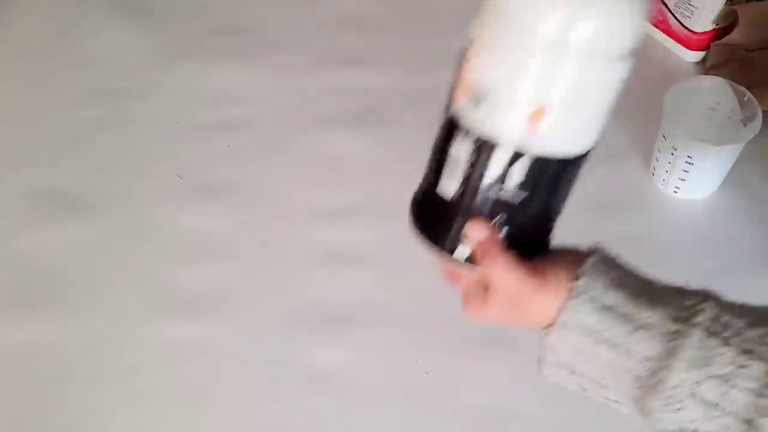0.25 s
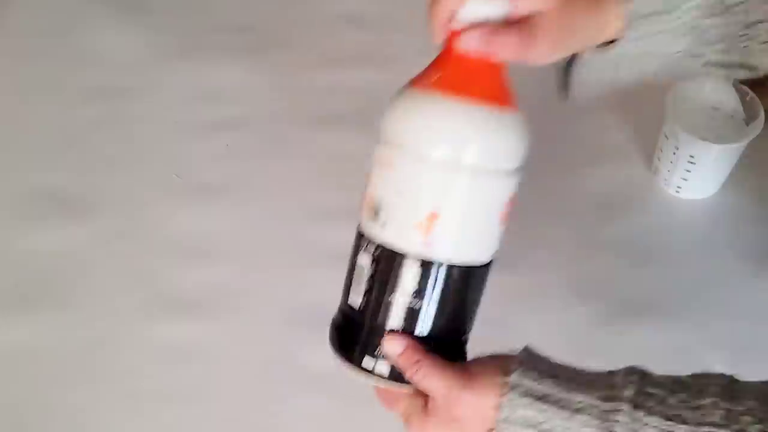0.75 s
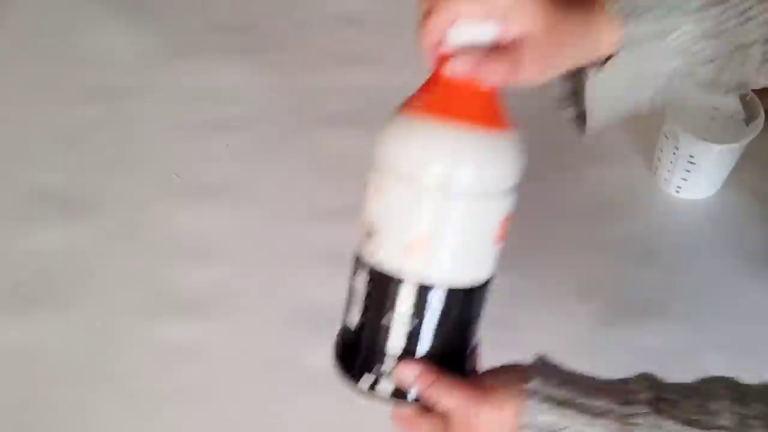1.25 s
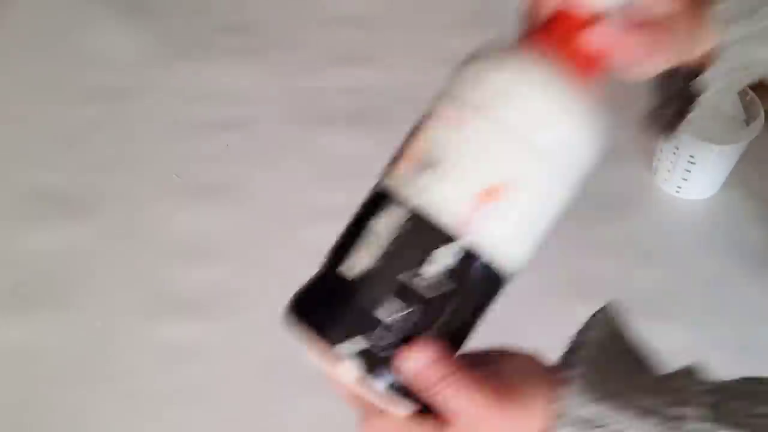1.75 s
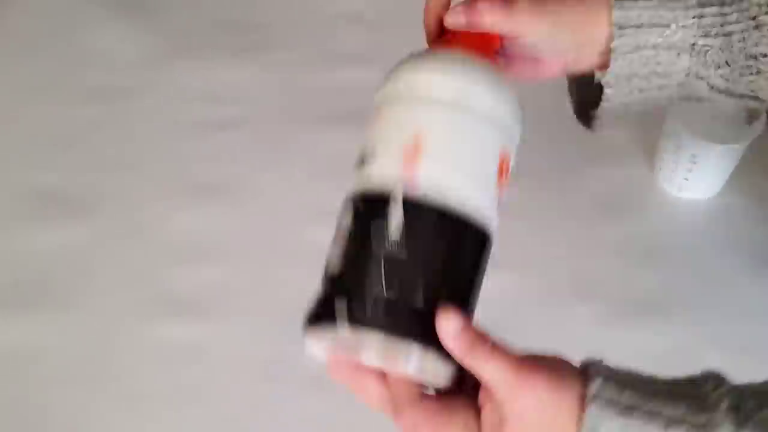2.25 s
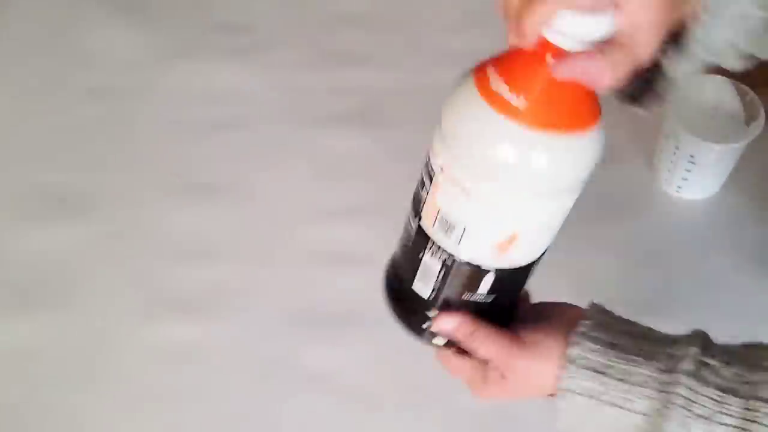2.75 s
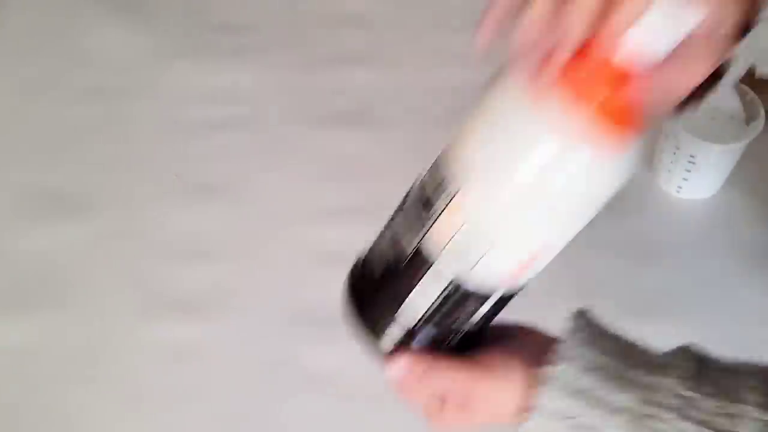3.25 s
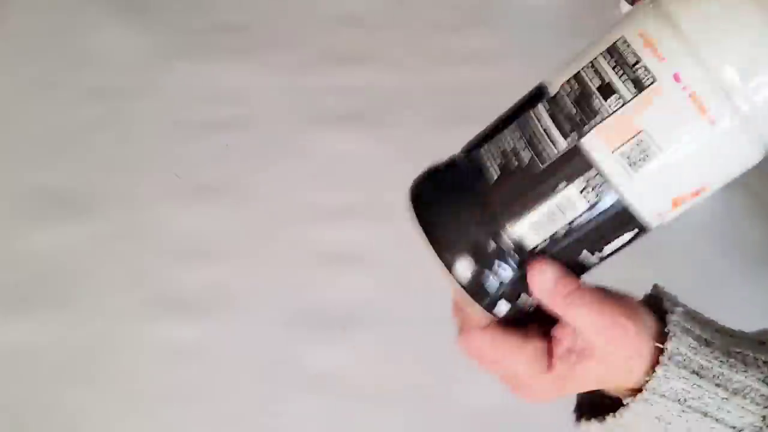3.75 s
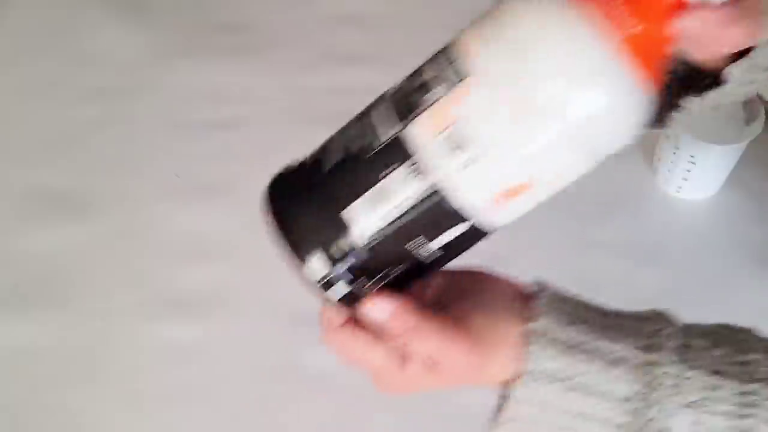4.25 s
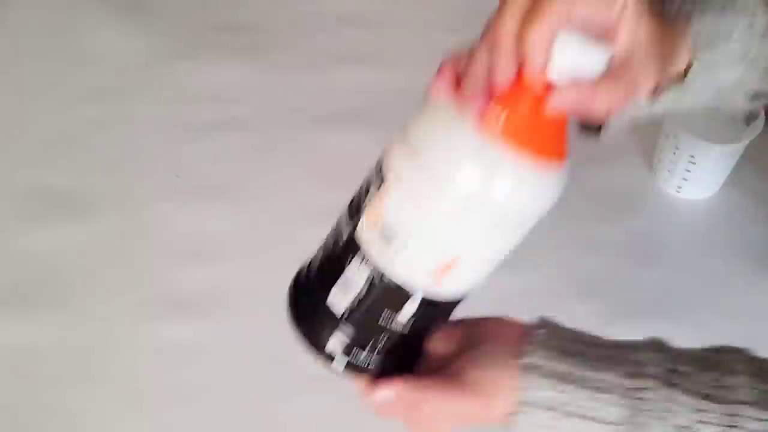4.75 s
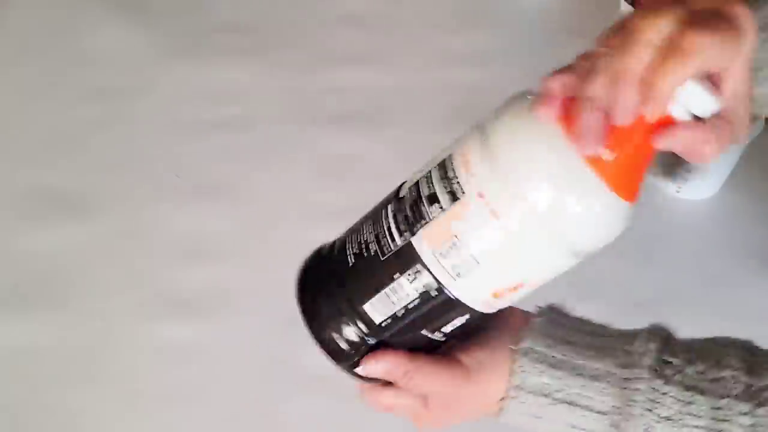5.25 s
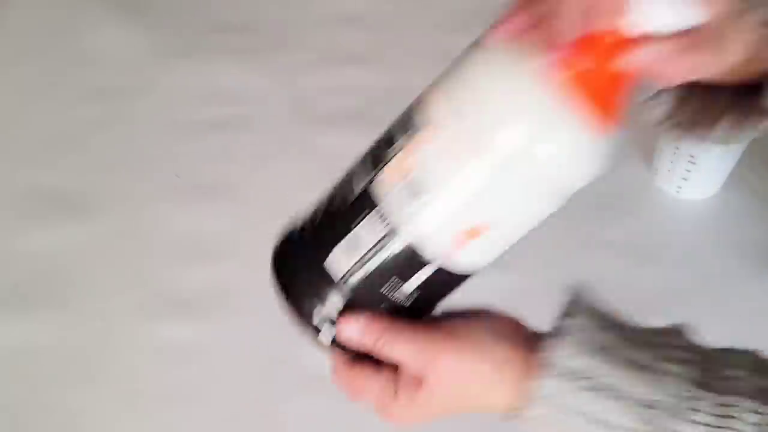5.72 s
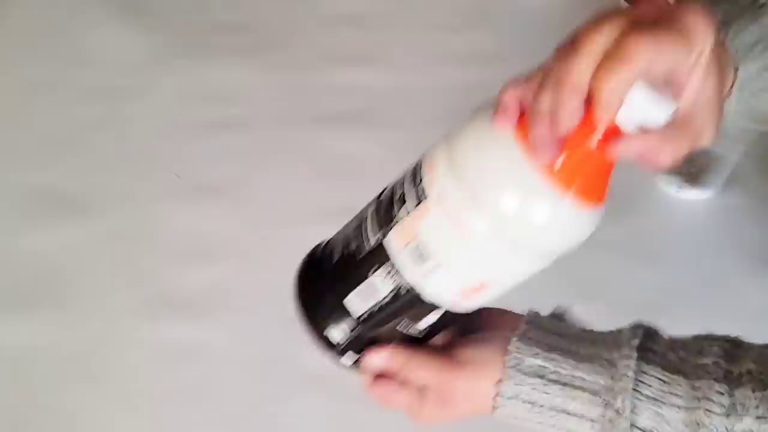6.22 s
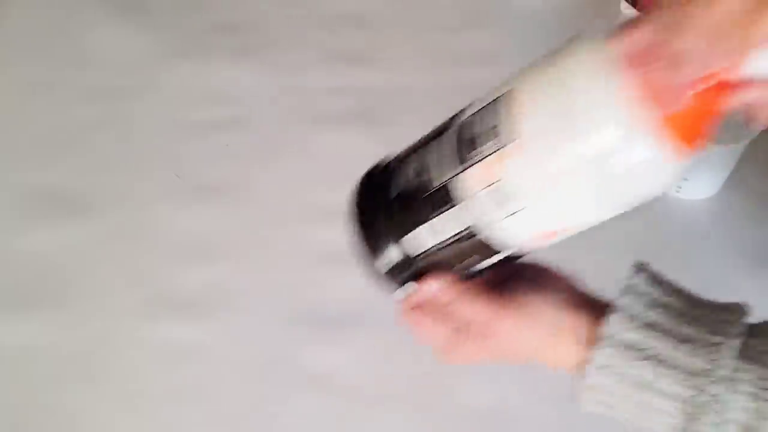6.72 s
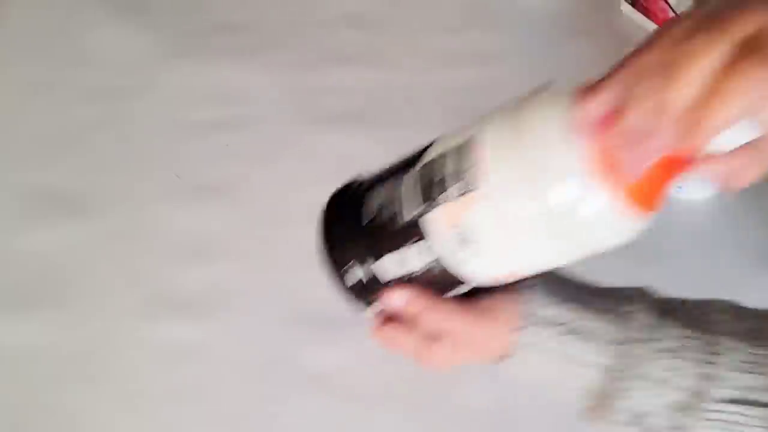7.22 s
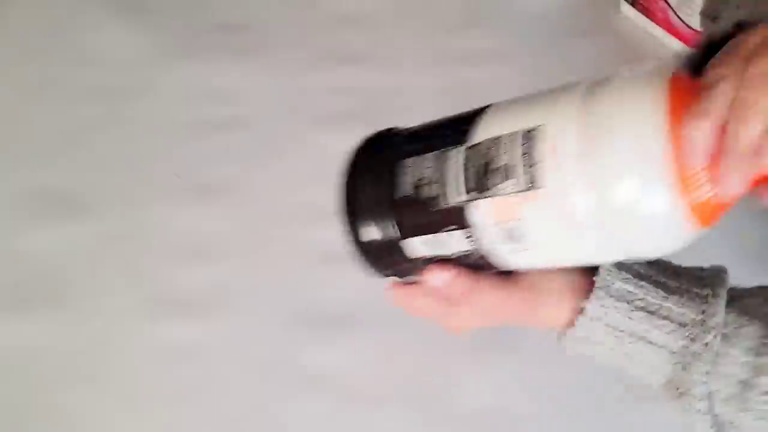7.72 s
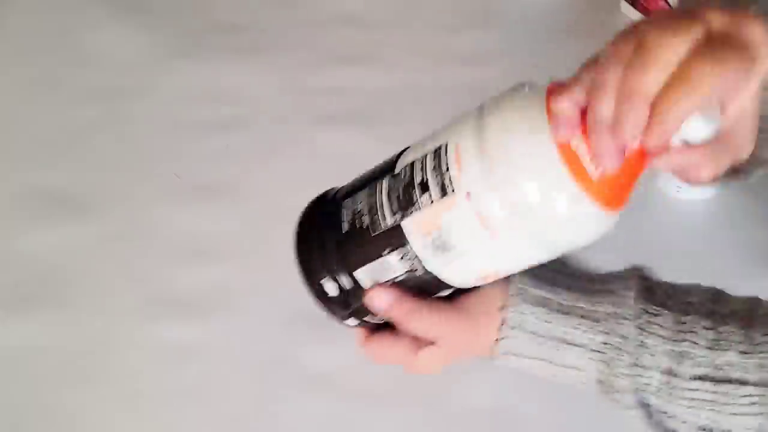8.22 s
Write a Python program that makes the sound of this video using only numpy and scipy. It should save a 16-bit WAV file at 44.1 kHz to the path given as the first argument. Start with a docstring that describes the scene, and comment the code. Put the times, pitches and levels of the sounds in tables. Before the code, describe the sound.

A half-full plastic bottle of thick liquid is shaken hard by hand, sloshing, slapping and popping wetly, with one short lull, in a small room.

```python
"""A plastic bottle, part full of thick liquid, is shaken by hand in a small room over a faint appliance hum.
0-2 s: strokes slap, run along the wall and break into draining froth (noise and short rings under envelopes).
Hands and sleeves rub (stick-slip noise); the wall thumps, pops ring, films smack (damped sines); the shell snaps.
From 0.8 s a few squeezed air pockets gurgle (gliding sines). 2-2.8 s: a lull with faint lumps and pops.
2.8-8.5 s: shaking resumes to the end, with a fizz that has grown slowly since the start."""
import sys
import numpy as np
from scipy import signal
from scipy.fft import rfft, irfft, next_fast_len
from scipy.io import wavfile
from scipy.ndimage import uniform_filter1d

SR = 44100
rng = np.random.default_rng(int(sys.argv[2]) if len(sys.argv) > 2 else 0)


def master(y):
    """Save y as 16-bit WAV."""
    cut = np.clip(np.atleast_2d(y).T, -1, 1)
    pcm = np.round(cut * 32767)  # scale
    wavfile.write(sys.argv[1], SR, pcm.astype(np.int16))


N = 373968

# Levels in the event tables are relative: the gains set in scene() come on top.
# appliance hum partials: (frequency [Hz], rms level ahead of the output filter [dB])
HUM_PARTIALS = [(52.8, -58.5), (119, -69.5), (210, -72.5), (339, -73.5)]
# room air spectrum: (frequency [Hz], relative density [dB])
AIR_SPECTRUM = [(25, 24.5), (70, 5), (350, -5.5), (700, -8.5), (2000, -26), (5500, -21.5), (10000, -26),
                (14500, -21.5)]
# left-right correlation of every stereo noise: (frequency [Hz], correlation)
STEREO_CORRELATION = [(150, 0.92), (500, 0.83), (1200, 0.75), (2500, 0.72), (5000, 0.042), (9000, .05)]
# shakes: slap at the start, run along the wall, break at the far end: (start [s], travel time [s],
# slap level [dB], slap tilt, wave level [dB], wave tilt, nominal wave rise [s], hand rub level [dB]);
# tilt is brightness, scaled to dB in each band by flow()
SHAKE_STROKES = [(0.0, 0.073, -38, -11, -32, -2, 0.033, -69),
                 (0.214, 0.12, -38.5, -5, -33, -3, 0.064, -59.5),
                 (0.495, 0.098, -50.5, 7, -35, -0.5, 0.059, -57.5),
                 (0.702, 0.13, -29.5, 3, -36.5, 1.5, 0.02, -59),
                 (0.969, 0.13, -36, 3, -34, -2.5, 0.0086, -62),
                 (1.22, 0.14, -37, 0.5, -34.5, 0.5, 0.038, -68),
                 (1.485, 0.15, -75, 19, -36, 0, 0.069, -59.5),
                 (1.756, 0.14, -43.5, 5, -37, 0.6, 0.028, -64.5),
                 (2.805, 0.055, -45, 3, -32.5, 1.5, 0.0086, -81),
                 (3.103, 0.021, -45.5, 4, -23.5, -1.5, 0.0045, -61.5),
                 (3.305, 0.13, -32, -4, -29, 0, 0.02, -62), (3.565, 0.12, -28.5, -3, -28, -4, 0.021, -71),
                 (3.885, 0.093, -29.5, -9, -46.5, 4, 0.048, -69.5),
                 (4.196, 0.081, -46, 0.5, -56.5, 11.5, 0.02, -84),
                 (4.422, 0.13, -30.5, 3, -28.5, 1.5, 0.0025, -71),
                 (4.719, 0.14, -46.5, 4, -43, 3, 0.049, -72),
                 (5.027, 0.12, -43.5, 7, -43.5, 5.5, 0.044, -83),
                 (5.241, 0.14, -35, 1.5, -34, 0, 0.018, -62),
                 (5.499, 0.12, -29.5, 0, -29.5, -0.5, 0.013, -61),
                 (5.769, 0.12, -27, -3.5, -33, 1, 0.056, -61), (5.978, 0.14, -42, 0, -31.5, 2, 0.033, -61),
                 (6.251, 0.0734, -28.5, -2, -30, -5, 0.0093, -55.5),
                 (6.423, 0.12, -40, 2.5, -27.5, -2, 0.015, -60),
                 (6.645, 0.072, -36, 3, -42.5, 6, 0.037, -61),
                 (6.794, 0.1, -27.5, -0.5, -31, -0.5, 0.025, -61.5),
                 (6.982, 0.13, -31, -13, -34, -1, 0.037, -52.5),
                 (7.205, 0.092, -40, -11, -35.5, 1.5, 0.04, -53),
                 (7.402, 0.11, -44, 4.5, -36, 2, 0.04, -58), (7.614, 0.11, -38, 0, -33.5, 0.5, 0.012, -80),
                 (7.824, 0.093, -26, 0.5, -42, 3.5, 0.025, -56),
                 (8.018, 0.13, -42, 4, -37, -1.5, 0.046, -66),
                 (8.239, 0.089, -45.5, -10, -37, 3, 0.012, -79)]
# stray lumps of liquid that hit the wall on their own: (time [s], level [dB], tilt)
STRAY_LUMPS = [(0.165, -37, -9), (0.532, -39, -8), (0.778, -28, -2), (1.055, -30.5, -2.5),
               (1.306, -35, -14), (1.51, -33, 0.5), (1.784, -37, 0), (2.237, -39.5, -2), (2.318, -58.5, 7),
               (2.464, -54, 9.5), (3.035, -35.5, -1), (3.15, -31.5, 4.5), (3.997, -33.5, 3),
               (4.241, -48.5, -0.5), (4.457, -30, 0.5), (4.774, -33, 0), (5.276, -38, 5.5),
               (5.342, -23.5, -3.5), (5.65, -42.5, 2.5), (5.746, -38.5, 3), (7.014, -31, 0),
               (7.486, -36.5, 8.5), (7.535, -41, -9), (7.677, -38.5, 6.5), (7.893, -34, 6), (7.95, -33, -2),
               (8.457, -37, -3)]
# froth spectrum before the bottle resonances: (frequency [Hz], relative density [dB])
SLOSH_SPECTRUM = [(50, -33), (110, 0), (200, 0.5), (280, -9), (400, -6.5), (700, -1.5), (1300, -1.5),
                  (2100, -3.5), (3900, -9), (5400, -12), (7200, -6.5), (9000, -17), (16000, -17)]
# bottle resonances: (frequency [Hz], width [Hz], gain [dB])
BOTTLE_MODES = [(324.7, 30.6, 14), (544, 27, 7), (700, 110, 4), (831, 14, -5), (1227, 89, 2.5)]
# low rumble of waves pressing on the wall: (frequency [Hz], relative density [dB])
PUSH_SPECTRUM = [(80, -31), (125, 16.0), (240, -24), (400, -60)]
# skin and wool friction: (frequency [Hz], relative density [dB])
RUB_SPECTRUM = [(80, 9.5), (400, -39), (1500, 13), (3500, 12.5), (5500, 6), (7300, 9), (8600, 1.5),
                (10500, -0.5), (12700, 6), (15800, -5)]
# wool brushing as the arms move: (time [s], level [dB])
SLEEVE_LEVELS = [(0, -60.5), (2.1, -77), (2.56, -70), (2.67, -67), (2.78, -63), (3.8, -69), (5.5, -69),
                 (7.0, -54.5), (7.8, -65.5), (8.48, -52)]
# shell snapping under the fingers: (time [s], level [dB])
SHELL_SNAPS = [(0.2185, -23.5), (0.6878, -28), (0.702, -22), (0.9795, -29), (0.998, -22), (1.2197, -34),
               (1.484, -36), (1.754, -29), (2.2355, -27), (3.1524, -28), (3.295, -32.5), (3.658, -26),
               (4.421, -23), (4.723, -28.5), (5.055, -33.5), (5.3445, -27.5), (5.504, -31), (5.7697, -27),
               (5.8546, -27), (6.3007, -17), (6.34, -21.5), (7.1903, -35), (7.3962, -32), (7.706, -30),
               (7.812, -20.5), (8.0047, -28.5), (8.145, -25.5), (8.4575, -24.5)]
# snap colour: (frequency [Hz], relative density [dB])
SNAP_SPECTRUM = [(200, -9), (1500, -14.0), (7300, 27.0), (9500, 13.5), (16000, 8.0)]
# liquid bulging the soft wall: (time [s], level [dB], pitch [Hz])
WALL_THUMPS = [(0.035, -39.5, 112), (0.221, -37.5, 139), (0.334, -31, 357), (0.699, -34.5, 148),
               (1.032, -33, 183), (1.528, -30, 166), (2.236, -39, 168), (2.767, -29, 197),
               (3.026, -40, 113), (3.124, -31, 181), (3.335, -36, 184), (4.418, -32.5, 170),
               (4.551, -33.5, 151), (5.862, -32, 151), (6.086, -32, 215), (6.456, -39, 220),
               (7.223, -32.5, 161), (7.275, -32, 206), (7.823, -28.5, 222), (7.895, -36.5, 129)]
# single ringing pops, low to high, with one high snap-like ping at 7.6 s:
# (time [s], pitch [Hz], level [dB], life [s])
RINGING_POPS = [(0.071, 665, -28.5, 0.0075), (0.498, 1120, -25.5, 0.0013), (0.824, 1000, -21, 0.0032),
                (0.868, 409, -23.5, 0.0027), (1.0766, 817, -16, 0.001), (1.333, 770, -21.5, 0.0018),
                (1.356, 605, -23.5, 0.0028), (1.605, 347, -24, 0.0036), (2.58, 760, -45.5, 0.0026),
                (2.666, 1060, -46, 0.0012), (2.749, 685, -44, 0.004), (2.854, 605, -23.5, 0.0019),
                (3.149, 600, -19.5, 0.0023), (3.428, 654, -21.5, 0.002), (3.676, 683, -19, 0.0022),
                (4.117, 217, -30, 0.0061), (4.554, 525, -22, 0.0023), (4.846, 886, -29.5, 0.0026),
                (5.094, 1780, -23.5, 0.0013), (5.119, 3200, -23.5, 0.00092), (5.241, 563, -22.5, 0.0014),
                (5.274, 1360, -17.5, 0.0026), (5.345, 2420, -18, 0.00084), (5.397, 2150, -20, 0.00076),
                (5.603, 1220, -24, 0.0019), (5.635, 645, -25.5, 0.0024), (5.878, 1430, -24, 0.0016),
                (5.884, 750, -21, 0.001), (6.0178, 1650, -14.5, 0.0012), (6.081, 340, -24, 0.0019),
                (6.115, 480, -23, 0.0039), (6.264, 3120, -31, 0.0021), (6.348, 1530, -24.5, 0.0015),
                (6.532, 1130, -24, 0.0015), (6.687, 2990, -27, 0.0018), (6.8536, 786, -19, 0.0039),
                (6.88, 707, -19.5, 0.0034), (6.896, 764, -29, 0.0016), (7.014, 1400, -20, 0.0014),
                (7.294, 2200, -20.5, 0.001), (7.618, 6580, -23.5, 0.00044), (7.679, 1900, -25, 0.00092),
                (7.897, 1330, -13.5, 0.00076), (7.912, 557, -23.5, 0.0025), (8.15, 660, -27.5, 0.0036),
                (8.323, 720, -28.5, 0.0021), (8.359, 840, -21, 0.0011)]
# bursting films and drops hitting the wall: (time [s], pitch [Hz], level [dB])
WET_SMACKS = [(0.089, 1220, -19), (0.197, 2070, -25), (0.3017, 1520, -16), (0.454, 1600, -27.5),
              (0.533, 2330, -27), (0.5767, 1270, -21), (0.689, 2770, -23), (0.779, 784, -22.5),
              (0.97, 2770, -19.5), (1.306, 1140, -19.5), (1.701, 1420, -30), (1.755, 2320, -29),
              (1.891, 1680, -20), (2.234, 890, -32), (2.317, 1590, -36.5), (2.399, 2700, -31),
              (2.4588, 2520, -22.5), (2.841, 2800, -23.5), (2.948, 2930, -27), (3.103, 2410, -21.5),
              (3.1243, 1170, -12.5), (3.3099, 2140, -19), (3.388, 1430, -25.5), (3.662, 4450, -18.5),
              (3.919, 2900, -20.5), (3.965, 2520, -19), (3.996, 1820, -18.5), (4.148, 1900, -34),
              (4.196, 2420, -32.5), (4.239, 2080, -22), (4.253, 1070, -24), (4.279, 1560, -25),
              (4.5532, 1070, -21.5), (4.795, 3300, -22.5), (4.884, 2400, -27), (5.025, 1290, -25.5),
              (5.03, 3330, -26.5), (5.261, 1120, -19.5), (5.054, 2900, -22), (5.346, 1830, -15.5),
              (5.511, 3170, -13.5), (5.979, 2130, -22), (6.072, 2300, -30), (6.312, 2450, -13.5),
              (6.424, 2230, -23), (6.46, 1320, -26.5), (6.501, 2690, -18.5), (6.714, 1350, -24),
              (6.795, 1180, -18), (7.025, 3200, -18), (7.078, 1960, -16), (7.315, 1830, -19.5),
              (7.4875, 2180, -15), (7.681, 1830, -18.5), (7.855, 2410, -16.5), (8.1068, 1250, -21),
              (8.42, 910, -29)]
# air pockets squeezed along the wall: (time [s], length [s], start pitch [Hz], end pitch [Hz],
# level before flutter [dB])
AIR_GURGLES = [(0.849, 0.027, 763, 450, -38), (2.778, 0.032, 255, 550, -42.5),
               (2.971, 0.072, 454, 1450, -43), (4.996, 0.024, 1060, 1380, -43),
               (6.248, 0.026, 940, 1430, -33), (6.976, 0.028, 1580, 1040, -33),
               (7.203, 0.0246, 850, 1630, -35), (7.588, 0.047, 580, 1415, -41)]
# reverberation: (frequency [Hz], decay time to -60 dB [s])
ROOM_T60 = [(150, 0.21), (500, 0.12), (2500, 0.23), (12000, 0.099)]

ENVELOPE_STEP = 64  # samples per envelope tick
SLAP_RISE_S, SLAP_HOLD_S, SLAP_FALL_S = 0.01, 0.0063, 0.012
WAVE_FALL_S = 0.013
RUN_REL_WAVE_DB, RUN_TILT, RUN_RISE_S = -25, 3, 0.0051
DRAIN_REL_WAVE_DB, DRAIN_S = -19, 0.078
FIZZ_START_DB, FIZZ_GROWTH_DB_PER_S, FIZZ_TREBLE_DB, FIZZ_DECAY_S = -72, 2, -6, 0.26
RUB_ATTACK_S, RUB_RELEASE_S, RUB_SAG_DB_PER_S = 0.00066, 0.022, 14
SCUFF_REL_SNAP_DB, SCUFF_HOLD_S, SCUFF_DECAY_S = -25.5, 0.0035, 0.016
ECHO_CHANGE_S = 0.12
TOP_HZ = 16000


def amp(db):
    """Decibels to gain."""
    return 10 ** (np.asarray(db) / 20)


def unit(x):
    """Scale to rms 1."""
    return x / np.sqrt(np.mean(x ** 2) + 1e-20)


def noise():
    """Two independent channels of white noise."""
    return rng.standard_normal((2, N))


def along(points, hz):
    """Interpolate (Hz, value) points on a log frequency axis."""
    f, v = np.transpose(points)
    return np.interp(np.log(hz + 1), np.log(f + 1), v)


def curve(rows):
    """Interpolate (s, value) rows to one value per sample."""
    return np.interp(np.arange(N) / SR, *np.transpose(rows))


def filtered(x, response):
    """Apply a frequency response by FFT."""
    m = next_fast_len(N + 8192)
    spectrum = rfft(x, m) * response(np.fft.rfftfreq(m, 1 / SR))
    return irfft(spectrum, m)[..., :N]


def add(track, s, sound):
    """Mix a sound in at time s."""
    part = track[..., max(round(s * SR), 0):][..., :sound.shape[-1]]
    part += sound[..., :part.shape[-1]]


def stereo(pair, spectrum):
    """Colour two unrelated signals and blend them: mostly shared in the bass, separate in the treble; rms 1."""
    def response(hz):
        angle = np.arccos(np.clip(along(STEREO_CORRELATION, hz), -1, 1)) / 2
        return amp(along(spectrum, hz)) * np.array([np.cos(angle), np.sin(angle)])
    mid, side = filtered(pair, response)
    return unit(np.array([mid + side, mid - side]))


def columns(rows):
    """Time since each event on the envelope clock, then the other columns of its table."""
    s, *rest = np.transpose(rows)[:, :, None]
    return np.arange(0, N, ENVELOPE_STEP) / SR - s, *rest


def together(*envelopes):
    """Sum the power of event envelopes into one gain per sample."""
    power = sum(np.sum(e ** 2, axis=0) for e in envelopes)
    return np.interp(np.arange(N), np.arange(0, N, ENVELOPE_STEP), np.sqrt(power))


def swell(t, rise_s, fall_s):
    """Envelope with a Gaussian rise and fall, cresting at t = 0."""
    return np.exp(-np.minimum((t / np.where(t < 0, rise_s, fall_s)) ** 2, 20))


def held(t, attack_s, hold_s, release_s):
    """Envelope that rises from t = 0, holds and decays exponentially."""
    return np.clip(t / attack_s, 0, 1) * np.exp(-np.clip((t - hold_s) / release_s, 0, 20))


def ticks(spread_db, life_s, count):
    """Envelope of sudden random kicks with exponential decay, rms 1."""
    when, strength = rng.random((count, 2)).T
    gains = amp(-spread_db * np.log(1 - .98 * strength))
    kicks = np.bincount((when * N).astype(int), gains, minlength=N)
    return unit(signal.lfilter([1], [1, -np.exp(-1 / (life_s * SR))], kicks))


def ring(hz, life_s, sag, sharpness, wander=0):
    """Damped oscillation cresting after half a life; pitch falls by sag (rises if negative), phase may wander."""
    u = 2 * np.arange(SR // 10) / SR / life_s
    phase = np.pi * hz * life_s * np.cumsum(1 + sag * (1 - np.minimum(u, 4) / 2)) * u[1]
    drift = uniform_filter1d(np.cumsum(rng.standard_normal(len(u))), size=30) * np.sqrt(u[1])
    return (u * np.exp(1 - u)) ** sharpness * np.sin(phase + wander * drift)


def background(air_db):
    """Room air as coloured noise and an appliance hum as steady sines."""
    t = np.arange(N) / SR
    hum = np.zeros(N)
    for hz, db in HUM_PARTIALS:
        hum += amp(db) * np.sqrt(2) * np.sin(2 * np.pi * (hz * t + rng.random()))
    return hum + amp(air_db) * stereo(noise(), AIR_SPECTRUM)


def flow(db_per_tilt, stretch, drain_db):
    """Envelope of one band of the liquid: slap, run along the wall, breaking wave, draining foam, stray lumps."""
    def gain(db, tilt):
        return amp(db + db_per_tilt * tilt)

    def slap(t):
        return held(t + SLAP_RISE_S / 2, SLAP_RISE_S, SLAP_HOLD_S, SLAP_FALL_S * stretch)

    t, travel_s, slap_db, slap_tilt, wave_db, wave_tilt, rise_s, _ = columns(SHAKE_STROKES)
    slaps = gain(slap_db, slap_tilt) * slap(t)
    runs = gain(wave_db + RUN_REL_WAVE_DB, RUN_TILT) * held(t, RUN_RISE_S, travel_s, WAVE_FALL_S)
    waves = gain(wave_db, wave_tilt) * swell(t - travel_s, rise_s / stretch, WAVE_FALL_S * stretch)
    foam_gain = amp(wave_db + DRAIN_REL_WAVE_DB + drain_db)
    foam = foam_gain * held(t - travel_s, WAVE_FALL_S, WAVE_FALL_S, DRAIN_S)
    t, lump_db, lump_tilt = columns(STRAY_LUMPS)
    lumps = gain(lump_db, lump_tilt) * slap(t)
    return together(slaps, runs, waves, foam, lumps)


def grains(low_hz, high_hz, cycles, spread_db, glide, count, size):
    """Stream of soft-starting bubble rings of random pitch, glide and strength, rms 1."""
    when, pitch, strength, bend = rng.random((count, 4)).T[:, :, None]
    hz = low_hz + (high_hz - low_hz) * pitch ** 2
    turns = hz * np.arange(size) / SR
    age = turns / (cycles * np.sqrt(hz / 1000))  # small bubbles ring for more cycles
    gain = np.sqrt(hz) * amp(-spread_db * np.log(1 - .97 * strength))
    phase = 2 * np.pi * turns * (1 + glide * (bend - .5) * np.tanh(age / 4))
    rings = gain * age * np.exp(-age) * np.sin(phase) * np.linspace(1, 0, size)
    places = (when * N).astype(int) + np.arange(size)
    return unit(np.bincount(places.ravel(), rings.ravel(), minlength=N)[:N])


def bottle_response(hz):
    """Direct sound plus parallel band-pass resonances of the bottle."""
    total = 1
    for centre_hz, width_hz, db in BOTTLE_MODES:
        damping = 1j * hz * width_hz
        total = total + (amp(db) - 1) * damping / (centre_hz ** 2 - hz ** 2 + damping)
    return total


def froth(ringing_db, spray_db, evenness):
    """Clumped squashed bubbles and free-ringing ones over crackling spray, coloured by the bottle."""
    squashed = np.array([grains(200, 6000, cycles=.6, spread_db=3, glide=.4, count=14000, size=250)
                         for _ in range(2)])
    ringing = np.array([grains(400, 4600, cycles=1.9, spread_db=2.1, glide=.25, count=3200, size=800)
                        for _ in range(2)])
    clumps = unit(.3 + ticks(spread_db=2.4, life_s=.003, count=2000))
    spray = unit(ticks(spread_db=0.5, life_s=0.0045, count=5000) * noise())
    bubbles = clumps * (squashed + amp(spray_db) * spray) + amp(ringing_db) * ringing
    mix = filtered(stereo(bubbles, SLOSH_SPECTRUM), bottle_response)
    # neighbouring bubbles share the energy of the flow: even out the short-term power
    power = np.abs(uniform_filter1d(np.mean(mix ** 2, axis=0), size=700)) + 1e-9
    return unit(mix / power ** (evenness / 2))


def splashes(splash_db, push_db, pivot_hz, linger):
    """Waves swell and collapse into froth, small bubbles first, large ones lingering; rumble and fizz join."""
    dull = flow(db_per_tilt=0.03, stretch=linger, drain_db=1.0)
    bright = flow(db_per_tilt=2.0, stretch=0.69, drain_db=-12.0)
    liquid = froth(ringing_db=-.7, spray_db=-5.5, evenness=.9)
    large = filtered(liquid, lambda hz: 1 / (1 + (hz / pivot_hz) ** 4))
    small = liquid - large
    waves = dull * large + bright * small
    push = dull * stereo(noise(), PUSH_SPECTRUM)
    t, travel_s, *_ = columns(SHAKE_STROKES)
    stirred = together(held(t, travel_s, travel_s, FIZZ_DECAY_S))
    fizz_gain = amp(FIZZ_START_DB + FIZZ_GROWTH_DB_PER_S * np.arange(N) / SR)
    fizz = stirred * fizz_gain * (large + amp(FIZZ_TREBLE_DB) * small)
    return amp(splash_db) * waves + amp(push_db) * push + fizz


def rubbing():
    """Friction strength: hands slip through each stroke and skid after each snap, over brushing sleeves."""
    t, travel_s, *_, grip_db = columns(SHAKE_STROKES)
    driving = held(t, RUB_ATTACK_S, travel_s, RUB_RELEASE_S)
    grips = amp(grip_db - RUB_SAG_DB_PER_S * np.clip(t, 0, 1)) * driving
    swing = np.clip(together(driving), .5, 1)  # the arms slow down between strokes
    t, snap_db = columns(SHELL_SNAPS)
    skids = amp(snap_db + SCUFF_REL_SNAP_DB) * held(t, RUB_ATTACK_S, SCUFF_HOLD_S, SCUFF_DECAY_S)
    return np.hypot(together(grips, skids), swing * amp(curve(SLEEVE_LEVELS)))


def hands(rub_db, snap_db, snap_t60_s):
    """Skin and wool catch and slip (kicked noise); the shell snaps under the grip (decaying noise bursts)."""
    slips = .7 + ticks(spread_db=3.6, life_s=.002, count=900)
    rub = amp(rub_db) * rubbing() * stereo(slips * noise(), RUB_SPECTRUM)
    snaps, t = np.zeros(N), np.arange(SR // 20) / SR
    for s, db in SHELL_SNAPS:
        add(snaps, s, amp(db + snap_db - 60 * t / snap_t60_s))
    return rub + snaps * stereo(noise(), SNAP_SPECTRUM)


def thumps(thump_db, cycles):
    """The wall, loaded with liquid, swings low and briefly."""
    out = np.zeros(N)
    for s, db, hz in WALL_THUMPS:
        add(out, s, amp(db + thump_db) * ring(hz, cycles / hz, sag=0.06, sharpness=1.2))
    return out


def pops(pop_db, sag):
    """Single pops, low to high, start abruptly and ring briefly as damped sines, each panned at random."""
    out = np.zeros((2, N))
    for s, hz, db, life_s in RINGING_POPS:
        pan_db = rng.standard_normal() * np.array([[1], [-1]])
        add(out, s, amp(db + pop_db + pan_db) * ring(hz, life_s, sag, sharpness=.35, wander=.4))
    return out


def smacks(smack_db, crack_db, crack_s):
    """A film bursts with a tiny noise crack, and the pocket behind it rings for a few cycles."""
    out, t = np.zeros((2, N)), np.arange(SR // 10) / SR
    for s, hz, db in WET_SMACKS:
        crack = amp(crack_db) * np.exp(-t / crack_s) * rng.standard_normal((2, len(t)))
        pocket = ring(hz, 1.1 / hz, sag=-.1, sharpness=.35, wander=.3)
        add(out, s, amp(db + smack_db) * (pocket + crack))
    return filtered(out, lambda hz: 1 / (1 + (hz / 7500) ** 4))


def gurgles():
    """A squeezed air pocket: pitch glides in an S and quivers, level flutters."""
    out = np.zeros(N)
    for s, length_s, start_hz, end_hz, db in AIR_GURGLES:
        u = np.linspace(0, 1, round(length_s * SR))
        knots = rng.standard_normal(size=(2, 16))
        flutter, quiver = [np.interp(u, np.linspace(0, 1, num=16), k) for k in knots]
        glide = (1 + np.tanh(5 * (u - .5))) / 2
        hz = start_hz * (end_hz / start_hz) ** glide * (1 + .04 * quiver)
        level = amp(db + 6.3 * flutter) * np.sqrt(np.abs(np.sin(np.pi * u)))
        add(out, s, level * np.sin(2 * np.pi * np.cumsum(hz) / SR))
    return out


def echo():
    """Short diffuse noise tail, thin in the deep bass, where both ears share it."""
    hz, t, z = signal.stft(rng.standard_normal((2, SR // 4)), SR, nperseg=256)
    apart = np.minimum(hz / 1900, 1)[:, None]
    z = np.array([z[0] + apart * z[1], z[0] - apart * z[1]]) / np.sqrt(1 + apart ** 2)
    decay = amp(-60 * t / along(ROOM_T60, hz)[:, None])
    onset = 1 - np.exp(-t / 0.0013)
    tail = signal.istft(z * decay * onset, SR, nperseg=256)[1]
    highpass = signal.butter(1, 130, 'highpass', fs=SR)
    return signal.lfilter(*highpass, tail / np.linalg.norm(tail[0]))


def room(x):
    """Each place the moving bottle passes through has its own reflections: a new tail per block."""
    out, hop = np.zeros((2, N)), round(ECHO_CHANGE_S * SR)
    for start in range(0, N, hop):
        add(out, start / SR, signal.fftconvolve(x[:, start:start + hop], echo(), axes=1))
    return out


def scene():
    """The bottle, slightly to the right, with reflections and background."""
    bottle = splashes(splash_db=3.5, push_db=-14.5, pivot_hz=1730, linger=0.97)
    bottle = bottle + hands(rub_db=13.0, snap_db=-3.5, snap_t60_s=0.0099)
    bottle = bottle + thumps(thump_db=7.0, cycles=1.41)
    bottle = bottle + pops(pop_db=1.5, sag=0.0052)
    bottle = bottle + smacks(smack_db=-2.0, crack_db=-5.0, crack_s=0.0006)
    bottle = bottle + gurgles()
    balance = amp([[-.3], [.3]])
    return (bottle + amp(-5.5) * room(bottle)) * balance + background(air_db=-46.5)


def record(dry):
    """Output filter: cut the deepest bass and everything from TOP_HZ up."""
    def response(hz):
        highpass = 1 - 1 / (1 + (hz / 44) ** 6)
        return (hz < TOP_HZ) * highpass
    return filtered(dry, response)


dry = scene()
out = record(dry)
master(out)
```